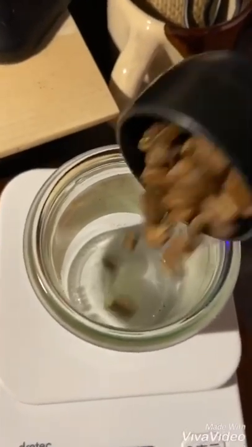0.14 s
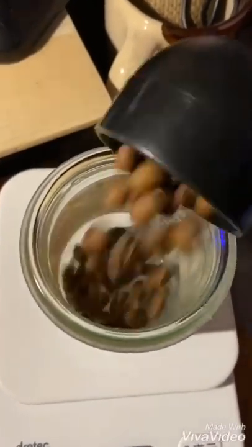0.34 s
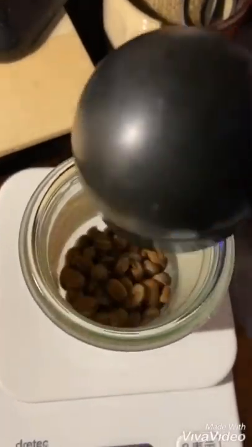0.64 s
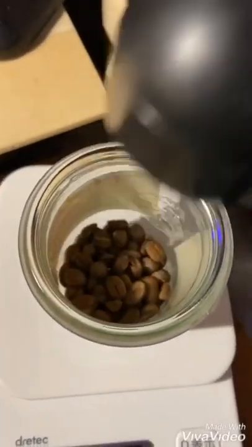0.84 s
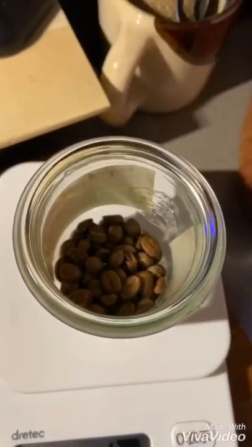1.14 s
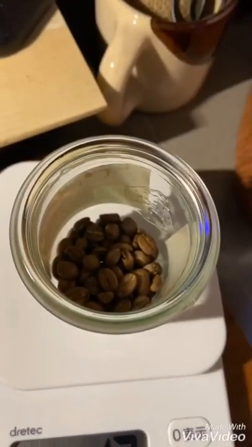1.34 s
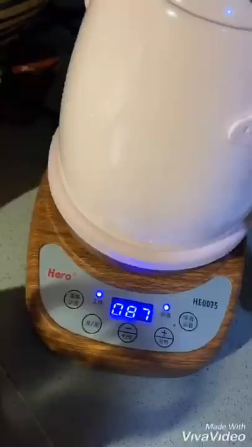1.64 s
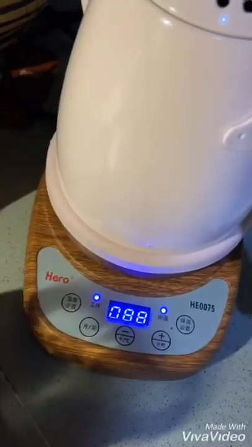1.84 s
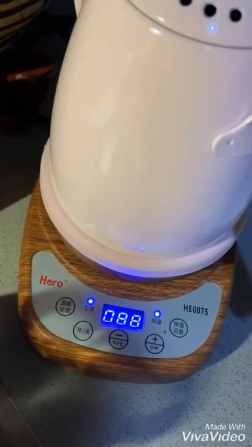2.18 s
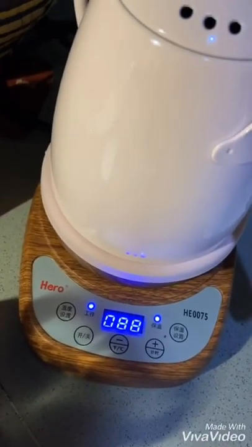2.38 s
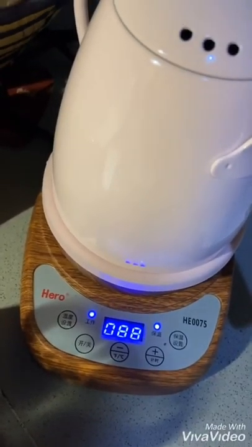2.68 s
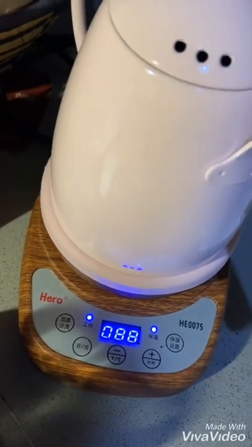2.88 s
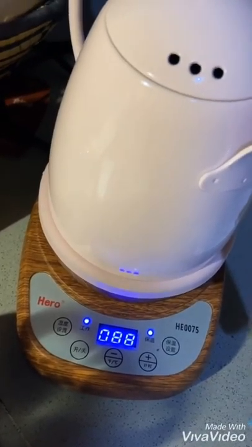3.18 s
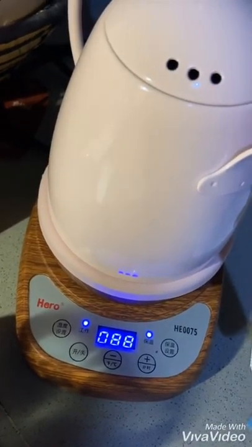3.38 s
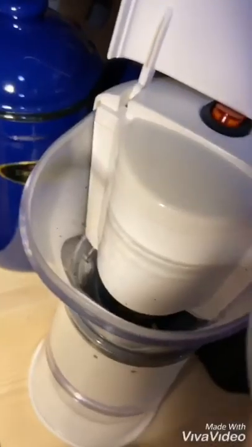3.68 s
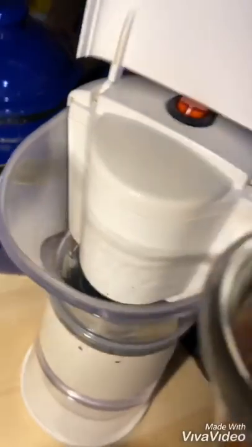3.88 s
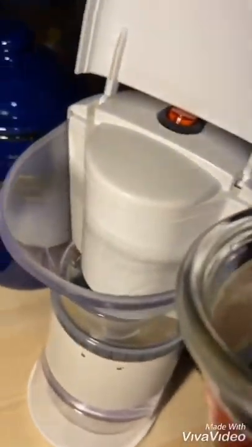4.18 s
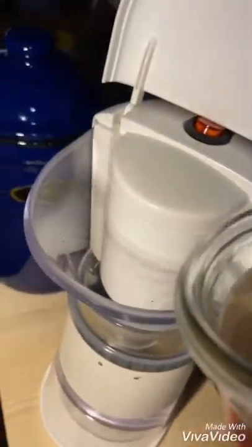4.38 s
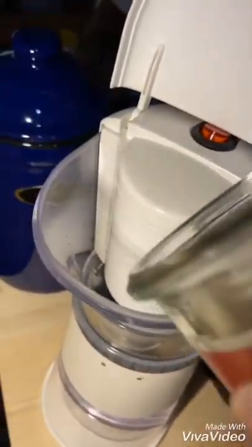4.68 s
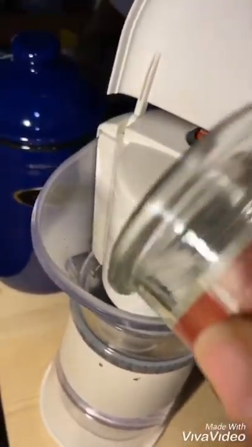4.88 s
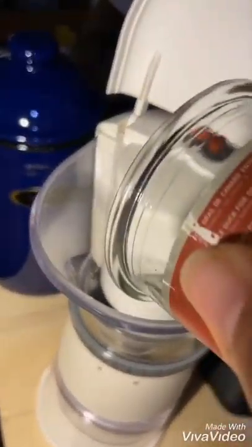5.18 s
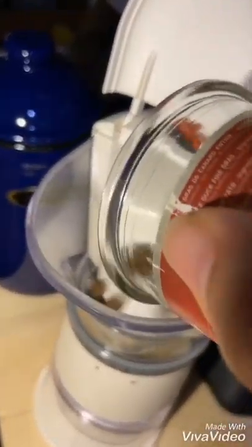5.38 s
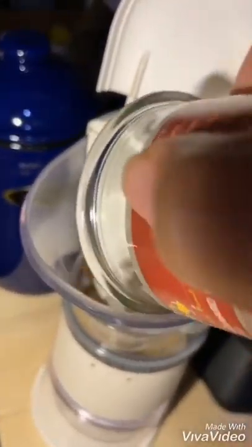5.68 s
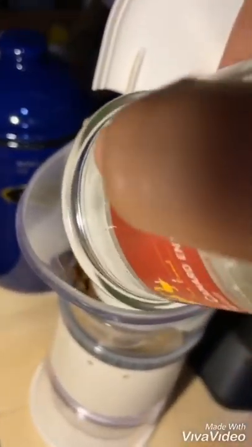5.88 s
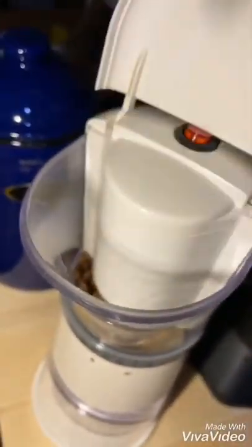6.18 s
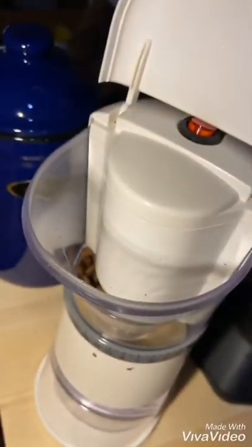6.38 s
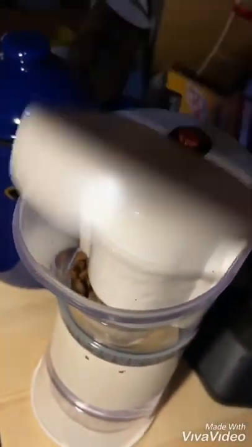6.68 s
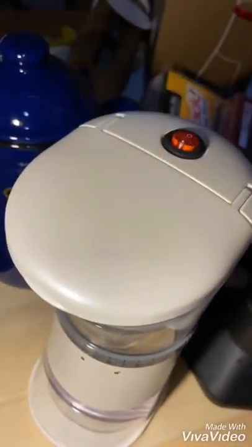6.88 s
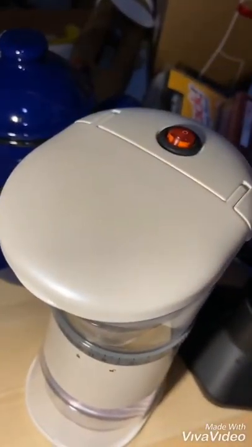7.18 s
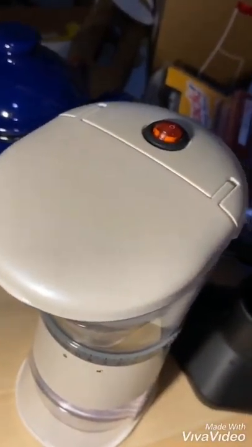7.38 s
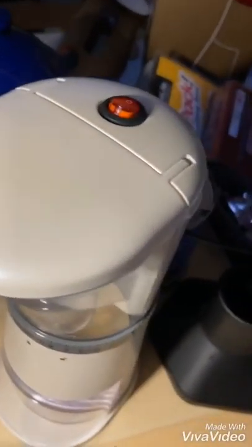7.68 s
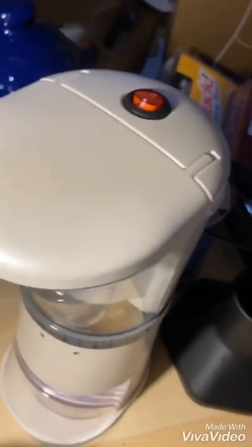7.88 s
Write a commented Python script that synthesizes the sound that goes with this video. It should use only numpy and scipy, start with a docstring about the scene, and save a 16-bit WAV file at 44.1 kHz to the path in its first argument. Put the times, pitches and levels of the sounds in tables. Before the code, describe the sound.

A small kitchen, heard close and in stereo, with a low extractor fan droning throughout. From 0.03 to about 0.6 s coffee beans shower into a standing glass jar: very bright, dense pings and dry ticks, thinning to a few last clicks. The fan then remains alone; at 1.6 s, after a tiny gap, it becomes louder and fuller, and at 3.5 s it drops back. Around 4.5 to 5.2 s come faint knocks and light glassy tinkling as beans slide in the held jar. From 5.2 to 5.8 s they pour into a plastic hopper, a loud, hard, crackling rattle with the glass singing, settling by 5.9 s. Faint ticks and handling knocks follow near 6.0 to 6.5 s. At 6.67 s a plastic lid snaps shut, loud and sharp with a small thump. Quiet fan again, then at 7.56 s a switch clacks and rattles briefly, fading by 7.85 s.

```python
"""Coffee beans strike a standing glass jar, then slide in the held jar and pour into a plastic hopper.
Beans ring the glass modes, clack on each other and drive the plastic; last, a lid snaps and a switch clacks and
rattles as contacts drive housing modes, a treble crack and a thump. An extractor fan of shaped noise drones behind;
the background has its own level in each passage and sinks under loud near sounds. A noise tail gives the
kitchen's reverberation."""
import sys
import numpy as np
from scipy import signal
from scipy.fft import rfft, irfft, next_fast_len
from scipy.io import wavfile
from scipy.ndimage import uniform_filter1d

SR = 44100
rng = np.random.default_rng(int(sys.argv[2]) if len(sys.argv) > 2 else 0)


def bounce(signal):
    """Save signal as a 16-bit WAV file at the path given by the first command-line argument."""
    frames = np.transpose(np.atleast_2d(signal))
    limited = np.clip(frames, -1, 1)
    pcm = np.round(limited * 32767).astype(np.int16)
    wavfile.write(sys.argv[1], SR, pcm)


N = 354563

# glass jar modes, wall's lowest first: pitch_hz, standing_db, held_db, undamped_t60_s
JAR_MODES = [(3536, -38, -19, .3), (9498, 2.5, -21, .17), (1120, -30, -40, .03), (4172, -40, -40, .1),
             (4930, -36, -15, .04), (5950, -36, -28, .02), (9345, -19, 1.5, .08), (9255, -26, 1.5, .06),
             (9733, -23, -30, .08), (11080, -24, -4, .25), (12900, -22, -10, .2), (14870, -24, -20, .07),
             (14590, -26, -40, .07), (15420, -14, -8, .03)]


def amp(db):
    """dB to gain."""
    return 10 ** (np.asarray(db) / 20)


def rms_one(x):
    """Scale to rms 1."""
    return x / np.sqrt(np.mean(x ** 2) + 1e-20)


def in_time(rows, outside=None):
    """Columns of a curve table, one value a sample."""
    s, *columns = np.transpose(rows)
    return [np.interp(np.arange(N) / SR, s, c, outside, outside) for c in columns]


def at_hz(points, hz):
    """Read a spectrum on a log-frequency axis."""
    point_hz, level_db = np.array(points)[:, 0], np.array(points)[:, 1]
    return np.interp(np.log(hz), np.log(point_hz), level_db)


def ring(impulses, hz, t60_s):
    """Two-pole resonance: a unit impulse starts a decaying sine of height 1."""
    radius, w = amp(-60 / (t60_s * SR)), 2 * np.pi * hz / SR
    return signal.lfilter([0, np.sin(w)], [1, -2 * radius * np.cos(w), radius * radius], impulses + 1e-18)


def add(out, s, sound):
    """Mix a short sound in at time s."""
    i = round(s * SR)
    out[i:i + len(sound)] += sound[:N - i]


def high(x, hz):
    """Steep high-pass."""
    return signal.sosfilt(signal.butter(4, hz, "high", fs=SR, output="sos"), x)


def coloured(spectrum):
    """Two unrelated steady noises with the given spectrum; joint rms 1."""
    size = next_fast_len(N)
    hz = np.maximum(np.arange(size // 2 + 1) * SR / size, 1)
    noise = rfft(rng.standard_normal((2, size)))
    return rms_one(irfft(noise * amp(at_hz(spectrum, hz)), size)[:, :N])


def clicks(per_s, spread_db):
    """Random clicks of uneven size, with expected mean power near 1."""
    sizes = amp(spread_db * np.minimum(rng.exponential(1, N), 5)) * rng.choice([-1, 1], N)
    share = np.clip(per_s / SR, 1e-4, 1)
    return rms_one(sizes) * (rng.random(N) < share) / np.sqrt(share)


def clatter(train, spectrum, cycles):
    """Clicks dealt to short resonances spread over the spectrum; a unit train gives rms near 1."""
    pitches = np.geomspace(spectrum[0][0], spectrum[-1][0], 40)
    gains = amp(at_hz(spectrum, pitches)) * pitches / np.sqrt(cycles * SR)    # level per Hz
    power = np.mean(gains ** 2 * cycles / pitches) * SR / (12 * np.log(10))
    gains = gains / np.sqrt(power)
    dealt = rng.integers(0, 40, N)
    return sum(g * ring(train * (dealt == k), hz, cycles / hz)
               for k, (hz, g) in enumerate(zip(pitches, gains)))


def glass_hits():
    """Each bean rings every jar mode with a strength of its own and adds a dry tick."""
    # beans striking the glass: start_s, relative ring_db, relative tick_db, tick_hz
    hits = [(0.0292, -12.5, -25, 10020), (0.1031, -13, -27, 10100), (0.1294, -12.5, -34, 9940),
            (0.1344, -9, -29.5, 10640), (0.1584, -17.5, -35, 15430), (0.1641, -14.5, -30, 10160),
            (0.1813, -25.5, -28.5, 14600), (0.1844, -10, -27, 10400), (0.1895, -9.5, -29, 10080),
            (0.1964, -13, -34, 10000), (0.2129, -16, -33, 10260), (0.2179, -13, -29, 15240),
            (0.2294, -13, -30, 10100), (0.2409, -23.5, -34.5, 10000), (0.2557, -16, -28.5, 10070),
            (0.2638, -14.5, -26.5, 15400), (0.2808, -14.5, -31, 10000), (0.2862, -19.5, -30, 10900),
            (0.2954, -17.5, -30, 10100), (0.3154, -19, -34, 10200), (0.3226, -22.5, -30, 10410),
            (0.3324, -18, -30, 15490), (0.3481, -14.5, -27.5, 11400), (0.3614, -21, -34.5, 10200),
            (0.3687, -19.5, -31.5, 10340), (0.3736, -20.5, -34.5, 10720), (0.3944, -28.5, -33.5, 10620),
            (0.4154, -31.5, -35.5, 15100), (0.4295, -38.5, -35.5, 11010), (0.4366, -31, -31, 11070),
            (0.4593, -35.5, -33, 10070), (0.4704, -37, -39.5, 10110), (0.4791, -35, -33, 11020),
            (0.4895, -28, -27.5, 11570), (0.4952, -22, -27.5, 9910), (0.5158, -34, -43, 11070),
            (0.5388, -29, -25.5, 10250), (0.5536, -24.5, -24, 10100), (0.5646, -44, -40, 10950),
            (0.5784, -63, -40, 11050), (0.6268, -70, -51, 10300), (0.6997, -59, -53.5, 11610),
            (4.5361, -25, -34, 11460), (4.5741, -36, -26, 15200), (4.6179, -32.5, -44, 11260),
            (4.6453, -21.5, -38, 11640), (4.663, -37.5, -35, 11000), (4.6838, -30.5, -27.5, 11100),
            (4.6914, -29, -29, 11130), (4.7316, -26, -33, 11100), (4.7444, -37, -36.5, 11040),
            (4.7683, -25.5, -35, 11280), (4.7867, -24, -33.5, 11200), (4.816, -23, -31, 11100),
            (4.8249, -40.5, -42.5, 11100), (4.8377, -31.5, -42, 11250), (4.8509, -26.5, -35, 11100),
            (4.8644, -35.5, -47, 11100), (4.8797, -36.5, -56.5, 11100), (4.9272, -39.5, -56, 11100),
            (4.9407, -42, -34.5, 10840), (4.9606, -32.5, -40.5, 11400), (4.9732, -40.5, -41.5, 11170),
            (4.9874, -32.5, -52, 11100), (5.0054, -54.5, -47, 11100), (5.031, -35, -53, 11100),
            (5.0404, -33.5, -56, 11100), (5.0564, -45.5, -33, 11230), (5.0858, -30, -43.5, 11100),
            (5.1004, -32.5, -43, 11100), (5.109, -33.5, -31.5, 14800), (5.1258, -33.5, -57, 11100),
            (5.137, -33, -43.5, 10450), (5.1518, -35.5, -42, 11100), (5.1584, -39.5, -42, 11100),
            (5.1929, -45.5, -39.5, 10900), (5.2054, -42.5, -45.5, 11100), (5.216, -34, -41, 10900),
            (5.2292, -35.5, -42, 10800), (6.1444, -68, -70, 10800), (6.1744, -63.5, -70, 11300),
            (6.2944, -64, -63.5, 11100)]
    # standing jar as it fills: start_s, ring_time_share (0-1), ring_db, attack_s
    fill_s, *filling = np.transpose([(.14, 0.65, -2, 0.000079), (.2, 0.5, -0.5, 0.00078),
                                     (.36, 0.85, -1, 0.00061), (.42, 0.35, -8.5, .0002)])
    # jar in the hand: ring_time_share (0-1), ring_db, attack_s
    held_setting = (0.51, -3.5, .0004)
    lifted_s = 4.0
    bean_share, share_spread = [.85, .5], .1    # ring time left by beans on the glass: standing, held
    tick_gain_db, tick_t60_s, tick_swell_s = 3.5, 0.012, 0.00077
    tick_ring_db, tick_ring_t60_s = -9, 0.0049
    tick_low_hz = [5530, 4200]    # standing, held

    out, ticks, t = np.zeros(N), np.zeros((2, N)), np.arange(SR // 3) / SR
    tick_t = t[:900]
    tick_envelope = amp(-60 * tick_t / tick_t60_s) * np.minimum(tick_t / tick_swell_s, 1)
    modes = np.array(JAR_MODES)
    next_hits = list(hits[1:]) + [(N / SR,)]
    for (s, hit_db, tick_db, tick_hz), next_hit in zip(hits, next_hits):
        held = int(s > lifted_s)
        share, ring_db, attack_s = held_setting if held else [np.interp(s, fill_s, c) for c in filling]
        damping = share * (bean_share[held] + share_spread * rng.standard_normal())
        t60_s = modes[:, 3:] * np.clip(damping, .05, 2)
        gains = amp(hit_db + ring_db + modes[:, 1 + held] + rng.normal(0, 2.0, len(modes)))
        envelope = amp(-60 * t / t60_s) * np.minimum(t / max(attack_s, 1 / SR), 1)
        if not held:    # the next bean lands on the same floor and stills it
            since_next_s = t - next_hit[0] + s
            envelope = envelope * np.clip(1 - since_next_s / max(attack_s, .0005), 0, 1)
        add(out, s, gains @ (np.sin(2 * np.pi * modes[:, :1] * t) * envelope))
        tick = amp(tick_db + tick_gain_db) * rng.standard_normal(900) * tick_envelope
        add(ticks[held], s, tick + amp(tick_ring_db) * ring(tick, tick_hz, tick_ring_t60_s))
    return out + sum(high(tick, hz) for tick, hz in zip(ticks, tick_low_hz))


def wall_tone(rows):
    """Many small taps keep the jar wall's lowest mode singing."""
    taps_per_s, t60_s = 300, .2
    evenness = .7    # evenness of the tone's level: share 0-1
    tone = ring(clicks(taps_per_s, spread_db=-0.5), JAR_MODES[0][0], t60_s)
    tone = tone / uniform_filter1d(tone ** 2, size=1500) ** (evenness / 2)
    return amp(in_time(rows, outside=-200)[0] + 2.0) * rms_one(tone)


def jostling():
    """Beans clack on each other and keep the jar's wall and its upper modes ringing."""
    # beans moving in the jar, a list each standing and held: start_s, relative clack_db, relative glass_db
    moves = [
        [(0.03, -67.5, -68), (0.125, -61.5, -64), (0.16, -45.5, -56), (0.2, -45.5, -50), (0.33, -46, -48.5),
         (0.385, -51.5, -54), (0.43, -48, -58.5), (0.556, -55.5, -69), (0.66, -75, -100)],
        [(4.525, -79.5, -57), (4.6, -54, -41), (4.7, -51.5, -35), (4.8, -65.5, -48.5), (4.9, -66.5, -64),
         (5.08, -76.5, -60), (5.12, -46, -55), (5.25, -73.5, -56.5), (5.31, -59.5, -54.5)],
    ]
    # bean clack spectrum: pitch_hz, level_db
    bean = [(1600, -29), (3000, -32.5), (4000, -29.5), (5000, -7.5), (6200, -14), (8000, -13),
            (10500, -9.5), (13000, 3.5), (16000, -4)]
    # wall's lowest mode, a list each standing, held and lifted away: start_s, relative level_db
    wall_levels = [
        [(0.03, -63), (0.044, -57.5), (0.08, -52.5), (0.11, -60), (0.136, -56.5), (0.15, -59), (0.186, -48.5),
         (0.226, -47), (0.266, -60), (0.326, -58), (0.366, -65), (0.398, -53), (0.474, -49), (0.496, -53.5),
         (0.52, -51.5), (0.542, -47.5), (0.7, -70.5)],
        [(4.5, -67), (4.536, -59), (4.586, -45), (4.604, -55), (4.77, -42.5), (4.862, -48.5), (4.892, -59.5),
         (4.972, -50.5), (4.982, -55), (5.09, -52), (5.114, -43.5), (5.2, -49.5), (5.224, -39), (5.258, -56),
         (5.298, -33), (5.334, -40), (5.352, -35.5), (5.4, -38)],
        [(6.1, -94), (6.122, -93), (6.14, -79), (6.206, -74), (6.228, -89), (6.248, -83), (6.272, -94),
         (6.296, -73), (6.314, -74), (6.352, -94), (6.4, -91)],
    ]
    # air and beans in the jar's belly: pitch_hz, t60_s, [standing_db, held_db]
    thud_hz, thud_t60_s, thud_db = (1000, 0.0033, [-5, -15.5])
    blows_per_s, upper_rings_db = 5200, [12.5, -2.5]    # upper modes: standing, held

    out = 0
    for pose, rows in enumerate(moves, 1):
        clack_db, glass_db = in_time(rows, outside=-200)
        upper_db = glass_db + upper_rings_db[pose - 1]
        taps = clicks(blows_per_s / 8, spread_db=6.0)     # few of the blows reach the glass
        upper = sum(amp(mode[pose] - 29.5) * ring(taps * amp(upper_db), mode[0], 0.6 * mode[3])
                    for mode in JAR_MODES[1:])
        blows = amp(clack_db + 9.0) * clicks(blows_per_s, spread_db=1.5)
        clack = clatter(blows, bean, cycles=11.0)
        belly = ring(ring(taps, thud_hz, thud_t60_s), 1.2 * thud_hz, thud_t60_s)
        thud = rms_one(belly) * amp(clack_db + thud_db[pose - 1])
        out = out + high(clack + upper, hz=1506) + thud
    return out + sum(wall_tone(rows) for rows in wall_levels)


def pour():
    """A dense stream of beans excites the plastic hopper, single hard hits standing out of it."""
    # beans streaming, then settling: start_s, relative level_db
    stream = [(5.24, -67), (5.27, -56), (5.31, -36), (5.43, -35.5), (5.45, -35.5), (5.6, -33.5),
              (5.7, -34.5), (5.755, -42.5), (5.78, -56), (5.85, -63), (5.95, -77), (6.08, -72.5),
              (6.095, -87.5), (6.27, -87.5), (6.3, -76.5), (6.34, -90)]
    # hopper spectrum: pitch_hz, level_db
    hopper = [(600, -6.5), (900, -3), (1300, 2.5), (1700, -9.5), (2200, -1.5), (2700, -3), (3100, -21),
              (3600, -4.5), (4400, -4), (5700, 3.5), (8000, 3.5), (11000, -3), (16000, -3.5)]
    # single beans on the hopper wall: start_s, relative level_db
    wall_hits = [(5.1769, -19.5), (5.1854, -36), (5.1941, -23), (5.2046, -24.5), (5.2185, -17),
                 (5.223, -31.5), (5.2306, -31), (5.2418, -34.5), (5.2512, -23), (5.2662, -16.5),
                 (5.2724, -18.5), (5.2788, -8.5), (5.2911, -18.5), (5.301, -2.5), (5.3035, -6),
                 (5.3146, -10.5), (5.321, -10), (5.3278, -13.5), (5.3335, -10.5), (5.3425, -5),
                 (5.3542, -5.5), (5.366, -9.5), (5.3738, -1), (5.3857, -7.5), (5.391, -9), (5.3982, -7.5),
                 (5.4095, -11), (5.421, -15.5), (5.4291, -16.5), (5.4362, -9.5), (5.4395, -2),
                 (5.4443, -11), (5.4513, -12.5), (5.4604, -5.5), (5.4641, -14), (5.4753, -12.5),
                 (5.482, -11), (5.4891, -4), (5.5014, -15.5), (5.5082, -13), (5.5208, -10), (5.5301, -18),
                 (5.541, -16), (5.5454, -18.5), (5.5514, -12), (5.5566, -14), (5.5623, -15.5),
                 (5.567, -12.5), (5.5889, -11.5), (5.5977, -6.5), (5.6016, -10.5), (5.6153, -12),
                 (5.631, -12), (5.639, -8.5), (5.6536, -14), (5.6641, -15), (5.6759, -14), (5.6837, -20),
                 (5.6956, -14.5), (5.7039, -15), (5.7145, -16.5), (5.7248, -11.5), (5.7387, -16.5),
                 (5.75, -19), (5.758, -22.5), (5.765, -24), (5.7827, -22), (5.788, -24.5), (5.7946, -29.5),
                 (5.8066, -26), (5.811, -25), (5.8298, -37), (5.8435, -22.5), (5.869, -42), (5.8764, -31.5),
                 (5.9021, -48), (5.9117, -36.5)]
    stream_per_s, swell_s, hit_t60_s = 11000, .0015, .022

    train = amp(in_time(stream, outside=-200)[0] + 9.5) * clicks(stream_per_s, spread_db=-4.0)
    t = np.arange(SR // 40) / SR
    envelope = np.minimum(t / swell_s, 1) * amp(-60 * t / hit_t60_s)
    for s, hit_db in wall_hits:      # a hit is a short flurry of contacts
        add(train, s, amp(hit_db - 5.5) * rng.standard_normal(len(t)) * envelope)
    rattle = clatter(train, hopper, cycles=28.0)
    # the thin wall radiates little below its first modes
    return high(rattle, hz=1616) + amp(-8) * high(rattle, hz=614)


def knocks():
    """Chattering contacts drive housing modes, a crack and a thump; returns direct sound and wall feed."""
    # knocks on the grinder's housing: start_s, relative level_db, thump_db, treble_db (relative to level_db),
    # contact_t60_s, tilt_db_per_octave, favoured_hz, clean_ring_db
    blows = [(4.495, -36, -37.5, -28, 0.054, -6.5, 1930, -2), (4.508, -56, -33, -22, 0.039, 10.5, 716, -9),
             (4.828, -38, -43, -32, 0.045, -9, 1930, -2), (4.842, -50, -40, -30, 0.046, -4.5, 1020, 2),
             (5.971, -52, -69, -41, 0.015, 0, 1930, 14), (6.011, -48, -70, -40.5, 0.02, -3, 2170, 5),
             (6.071, -54, -70, -40, 0.033, -7, 1000, 5.5), (6.379, -55, -58, -39.5, 0.011, -1.5, 1200, -3),
             (6.494, -26.5, -32.5, -24.5, 0.062, -0.5, 1790, -2),
             (6.654, -36, -49.5, -18.5, 0.019, 10, 5100, -3),
             (6.665, -26.5, -45, -29.5, 0.074, -0.5, 2040, -7),
             (6.6728, -2, -21.5, -24.5, 0.0086, -7, 1634, 7.5),
             (6.6745, -1.5, -11, -12.5, 0.011, 8.5, 5200, -8.5),
             (7.553, -36.5, -60, -66, 0.065, 0.5, 2782, 4), (7.558, -25.5, -49, -68, 0.064, -2.5, 2793, 1),
             (7.5643, -9.5, -32, -22, .03, 5.5, 2600, 10), (7.5675, -7.5, -31, -23.5, 0.036, 2.5, 716, 5),
             (7.576, -15, -35.5, -22, 0.028, -5.5, 1530, 1), (7.588, -14, -31, -33, 0.05, -3, 2503, 8.5),
             (7.598, -23, -43, -27, 0.025, 1, 2503, 12), (7.606, -18.5, -29, -33, 0.044, -3.5, 1790, 0),
             (7.632, -33, -47, -31, 0.041, -3, 1000, 4), (7.65, -25.5, -41, -38, 0.032, -2.5, 1250, 11.5),
             (7.657, -19.5, -47, -39, 0.041, -5, 1930, 5.5), (7.666, -30, -37.5, -42, .03, -4, 1000, -3),
             (7.682, -29, -42, -38, 0.054, -6, 908, 7), (7.71, -40, -52, -35, 0.084, -3, 1530, -2),
             (7.74, -43, -59.5, -36, 0.1, -6, 1530, -8), (7.787, -39, -55, -39, 0.036, -10, 1600, 4),
             (7.825, -41, -57, -38, 0.052, -10, 1740, 7)]
    # plastic housing modes: pitch_hz, relative level_db, t60_s
    housing = [(597, -37.5, 0.024), (716, -6.5, 0.063), (1000, 5, 0.0053), (1250, -3.5, 0.029),
               (1530, -3, 0.0189), (1930, -0.5, 0.016), (2170, -5.5, 0.035), (2503, -10.5, 0.079),
               (2810, -4, 0.0253), (3277, -7, 0.025), (3735, -1.5, 0.011), (4530, -2.5, 0.0038),
               (4900, -3, 0.011), (5560, -1.5, 0.006), (6480, -5, 0.0086)]
    # low modes of the body on the counter: pitch_hz, level_db, t60_s
    body = [(123.9, -2, 0.04), (195, -16.5, 0.16), (245, 1.5, 0.033), (364, -0.5, 0.019),
            (487, -9.5, 0.023), (669, -7, 0.023)]
    attack_s, favour_octaves = .0013, .15
    thump_lag_cycles = 0.75   # each low mode sets in this late

    out, crack, push = np.zeros((2, N)), np.zeros((2, N)), np.zeros(N)
    t = np.arange(SR // 6) / SR
    for s, knock_db, thump_db, treble_db, contact_t60_s, tilt_db, favoured_hz, clean_db in blows:
        swell = np.minimum(t / attack_s, 1) * amp(-60 * t / np.clip(contact_t60_s, .005, .2))
        chatter = rng.standard_normal(len(t)) * swell
        # summed over all directions the chatter's colour evens out: the walls get one click
        blow = np.sqrt(np.sum(swell ** 2)) * (t == 0)
        for side, contact in enumerate([chatter, blow]):
            for k, (hz, mode_db, t60_s) in enumerate(housing):
                # a clean blow rings the modes near the spot that is struck
                nearness = np.exp(-(np.log2(hz / favoured_hz) / favour_octaves) ** 2)
                clean = (side == 0) * amp(clean_db) * nearness
                gain = (-1) ** k * amp(knock_db + mode_db - 25.5 + tilt_db * np.log2(hz / 2000))
                add(out[side], s, gain * ring(contact + clean * blow, hz, t60_s))
            add(crack[side], s, amp(knock_db + treble_db + 16.0) * contact * amp(-60 * t / 0.065))
        add(push, s, amp([thump_db]))
    thump = sum((-1) ** k * amp(db) * ring(np.roll(push, int(thump_lag_cycles * SR / hz)), hz, t60_s)
                for k, (hz, db, t60_s) in enumerate(body))
    crack = signal.sosfilt(signal.butter(2, 12500, fs=SR, output="sos"), high(crack, hz=5770))
    return out + crack + high(thump, hz=70)


def scattered(x):
    """A decorrelated second channel: the same spectrum through a chain of short all-pass delays."""
    # all-pass delays: delay_s, strength (0-1)
    delays = [(.0007, .5), (.0013, .55), (.0023, .5), (.0037, .45)]
    size = next_fast_len(N + SR // 4)
    spectrum, hz = rfft(x, size), np.arange(size // 2 + 1) * SR / size
    for delay_s, strength in delays:
        late = np.exp(-2j * np.pi * hz * delay_s)
        spectrum = spectrum * (late - strength) / (1 - strength * late)
    return irfft(spectrum, size)[:N]


def kitchen(x):
    """Diffuse tail: two decaying noises, duller with time."""
    level_db, t60_s, wall_cut_hz = -20, 0.48, 9000
    t = np.arange(SR // 2) / SR
    noise = rng.standard_normal((2, len(t)))
    dull = signal.sosfilt(signal.butter(1, wall_cut_hz, fs=SR, output="sos"), noise)
    tail = dull + (noise - dull) * amp(-60 * t / 0.2975)    # extra decay of the treble
    tail = tail * amp(-60 * t / t60_s) * np.minimum(t / 0.0047, 1)
    tail = tail / np.sqrt(np.sum(tail ** 2, axis=1, keepdims=True))
    return amp(level_db) * signal.fftconvolve(x[None], tail, axes=1)[:, :N]


def sinking(near):
    """Background attenuation in dB: follows near level above a threshold, recovers at a steady rate."""
    from_db, db_per_db, smoothing_s, recover_db_per_s = -34, 0.7573, 0.04, 39
    hop = 256
    level_db = 10 * np.log10(uniform_filter1d(near ** 2, size=1024)[::hop] + 1e-12)
    over_db = db_per_db * np.maximum(level_db - from_db, 0)
    r = np.exp(-hop / (smoothing_s * SR))
    over_db = signal.lfilter([1 - r], [1, -r], over_db)
    recovery_db = recover_db_per_s * np.arange(len(level_db)) * hop / SR
    sunk_db = np.maximum.accumulate(over_db + recovery_db) - recovery_db
    return np.interp(np.arange(N) / hop, np.arange(len(over_db)), sunk_db)


def faded(steps_db):
    """Spread each level step over 6 ms."""
    return uniform_filter1d(steps_db, size=int(.006 * SR))


def fan(near):
    """Extractor fan: a low noise drone with rumble below it and the duct's rushing air above."""
    # background level of each passage: start_s, drone_db, then relative to the drone: rumble_db, duct_db, hiss_db
    starts, drone_db, *levels_db = np.transpose([(0, -35, -11, -6, -13), (1.608, -29.5, -13, -11, -17.5),
                                                 (3.487, -37.5, -8.5, -20.5, -21),
                                                 (4.27, -37.5, -6.5, -22, -17.5),
                                                 (5.903, -40, -7, -18.5, -22),
                                                 (6.603, -40.5, -5.5, -18, -21.5)])
    # drone spectrum: pitch_hz, relative level_db_per_hz
    drone_body = [(41, -41), (70, -15.5), (108, -3), (140, -8.5), (178, -15), (193, -11), (231, -3),
                  (248, 3.5), (308, -3), (365, -17.5), (409, -28), (480, -15), (620, -59), (1060, -120)]
    # rumble spectrum: pitch_hz, relative level_db_per_hz
    rumble = [(15, -28), (40, -0.5), (65, 12), (90, 3.5), (130, -47.5)]
    # duct band spectrum: pitch_hz, relative level_db_per_hz
    duct = [(250, -48), (340, -6.5), (450, -2.5), (520, -1), (600, 3.5), (690, -3), (760, -24.5),
            (1000, -48.5)]
    # hiss spectrum: pitch_hz, relative level_db_per_hz
    hiss = [(500, 7.5), (800, 3), (1100, -2), (1300, 1.5), (1450, 1), (1700, -0.5), (1950, -4), (2100, 0.5),
            (2280, -1), (2600, -4.5), (3050, -7), (3300, -4), (4500, -11), (7000, -13), (9000, -17),
            (16000, -32)]
    # short gap in the background between two passages: time_s, gain_db
    gap = [(1.594, 0), (1.599, -28), (1.609, -28), (1.614, 0)]

    part = np.maximum(np.searchsorted(starts, np.arange(N) / SR, "right") - 1, 0)
    air = sum(amp(faded(db[part])) * coloured(spectrum)
              for db, spectrum in zip(levels_db, [rumble, duct, hiss]))
    level_db = faded(drone_db[part]) - sinking(near) + in_time(gap)[0]
    return amp(level_db) * (coloured(drone_body) + air)


def scene():
    """Channel 0 is the main signal, channel 1 a decorrelated companion for the stereo image."""
    beans = glass_hits() + jostling() + pour()
    knock, knock_to_walls = knocks()
    near = beans + knock
    return np.array([near, scattered(near)]) + kitchen(beans + knock_to_walls) + fan(near)


def record(dry):
    """Stereo image: right is a phase-turned mix of left and companion; peaks are rounded, the top is cut."""
    # stereo image: pitch_hz, left_lead_turns, likeness (0-1)
    image_hz, *columns = np.transpose([(50, 0, 1), (350, -.05, .99), (700, -.2, .9), (1100, .08, .4),
                                       (1700, .06, .8), (2200, .09, .8), (2900, .15, .4), (3900, .09, .7),
                                       (5000, .02, .9), (6100, .3, .65), (6800, .5, 1), (8050, .5, 1),
                                       (8900, .75, .55), (9750, 1, 1), (11550, 1, 1), (12100, 1.25, .5),
                                       (12700, 1.5, 1), (14250, 1.5, 1), (15000, 1.75, .4), (15600, 2, .95),
                                       (17000, 2, .95)])
    # level balance of the channels: pitch_hz, left_minus_right_db
    balance = [(50, -.2), (120, -1.2), (350, -2), (700, -4), (1100, -2.5), (1700, -0.5), (2200, 0.5),
               (4000, -0.5), (8000, 0)]
    cutoff_hz = 16000

    size = next_fast_len(N + 4096)
    left, other = rfft(dry, size)
    hz = np.arange(len(left)) * SR / size
    turns, alike = [np.interp(hz, image_hz, c) for c in columns]
    alike = np.clip(alike, 0, 1)
    lean = amp(at_hz(balance, hz + 1) / 2)
    right = (alike * left + np.sqrt(1 - alike ** 2) * other) * np.exp(-2j * np.pi * turns)
    pair = irfft(np.array([left * lean, right / lean]), size)[:, :N]
    # the deepest bass is cut
    pair = signal.sosfilt(signal.butter(2, 42, "high", fs=SR, output="sos"), pair)
    pair = pair / (1 + pair ** 4) ** .25
    return signal.sosfilt(signal.cheby2(20, 80, cutoff_hz + 250, fs=SR, output="sos"), pair)


dry = scene()
out = record(dry)
bounce(out)
```